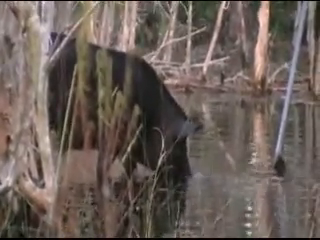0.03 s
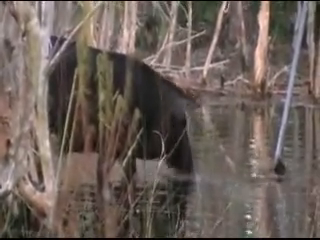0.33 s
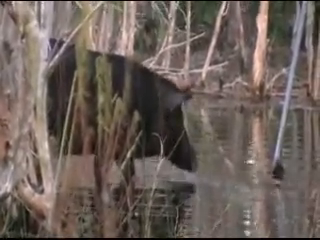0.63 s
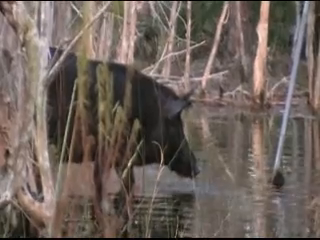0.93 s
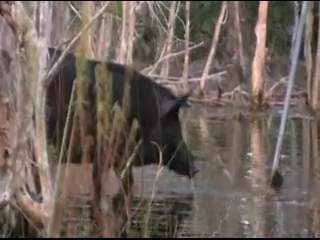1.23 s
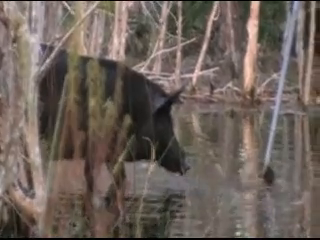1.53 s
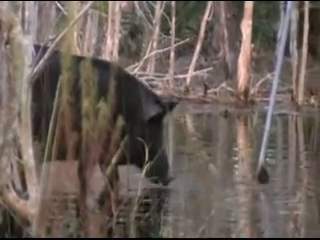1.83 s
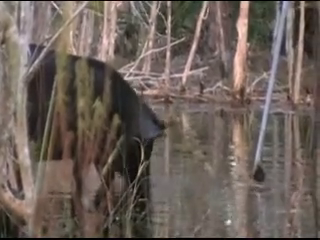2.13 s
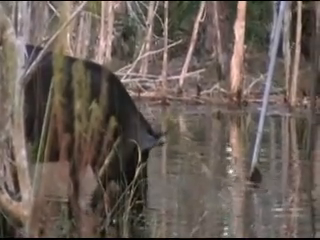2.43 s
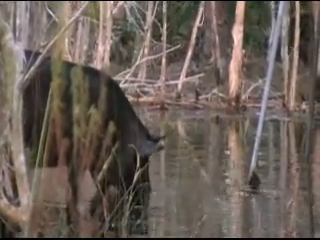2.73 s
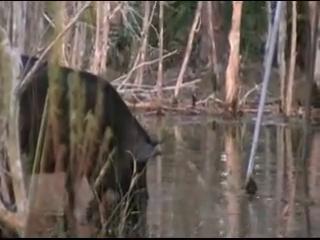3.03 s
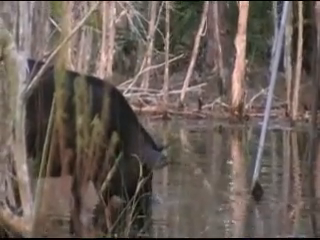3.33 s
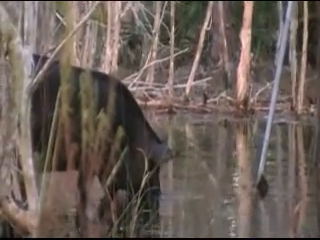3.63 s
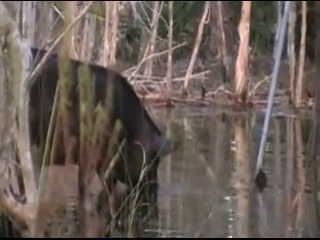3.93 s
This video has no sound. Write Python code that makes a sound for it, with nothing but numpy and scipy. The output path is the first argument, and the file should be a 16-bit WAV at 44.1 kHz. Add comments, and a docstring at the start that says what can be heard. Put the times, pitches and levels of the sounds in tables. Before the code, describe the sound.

A wild pig smacks wetly in shallow water, with dripping and a small bird chirping.

```python
"""A wild pig feeds in a shallow swamp, lifting its snout, smacking wetly and rooting among bubbles.
Each smack is a splat of noise and a ringing air pocket; under the strongest, the hollow mouth knocks.
Water streams off the snout as clouds of tiny ringing bubbles, and drops tick on the surface.
A small bird chips about twice a second, a trilled whistle that echoes among the trees.
A far low rumble and a faint hiss lie under it all."""
import sys
import numpy as np
from scipy import signal
from scipy.fft import rfft, irfft
from scipy.io import wavfile
from scipy.ndimage import uniform_filter1d

SR = 44100
rng = np.random.default_rng(int(sys.argv[2]) if len(sys.argv) > 2 else 0)


def to_wav(sig):
    """Store sig (one row per channel, or 1-D mono) as 16-bit WAV at the path in sys.argv[1].

    Samples outside -1..1 are clipped; the rate is SR.
    """
    pcm = np.clip(np.atleast_2d(sig), -1, 1) * 32767
    pcm = np.round(pcm).astype(np.int16)
    wavfile.write(sys.argv[1], SR, pcm.T)  # frames by channels


N = 176400
TIME = np.arange(N) / SR
EVENT_TIME = TIME[:SR // 6]  # time axis of one short sound
SMACK_ATTACK_S = 0.00076


def from_db(db):
    """Decibels to gain."""
    return 10 ** (np.asarray(db) / 20)


def rms_one(x):
    """Scale to unit power."""
    return x / np.sqrt(np.mean(x ** 2) + 1e-20)


def level(curve):
    """A fader ride through (t/s, level/dB) points."""
    return from_db(np.interp(TIME, *np.transpose(curve)))


def colour(spectrum, hz):
    """Gain at hz of an EQ curve through (f/Hz, level/dB) points."""
    points, db = np.transpose(spectrum)
    return from_db(np.interp(np.log(hz), np.log(points), db))


def coloured_noise(spectrum, size=N):
    """Steady noise of unit power that falls away steeply outside its EQ curve."""
    hz = np.maximum(np.fft.rfftfreq(size, 1 / SR), 1)
    skirts = np.minimum(1, np.minimum(hz / spectrum[0][0], spectrum[-1][0] / hz)) ** 24
    white = rfft(rng.standard_normal(size))
    return rms_one(irfft(white * colour(spectrum, hz) * skirts, size))


def burst(spectrum):
    """A short stretch of coloured noise."""
    return coloured_noise(spectrum, size=len(EVENT_TIME))


def wobble(samples):
    """A short random modulator: noise smoothed over some samples, at unit power."""
    return rms_one(uniform_filter1d(rng.standard_normal(len(EVENT_TIME)), size=samples))


def envelope(attack_s, t60_s, hold_s=0):
    """Rise, hold, then die away by 60 dB every t60_s."""
    rise = np.minimum(EVENT_TIME / attack_s, 1)
    return rise * from_db(-60 * np.maximum(EVENT_TIME - attack_s - hold_s, 0) / t60_s)


def add(out, s, sound):
    """Mix a sound in at time s."""
    start = max(int(s * SR), 0)
    out[start:start + len(sound)] += sound[:N - start]


def background():
    """The ambience bed: far rumble with a drone in it, faint hiss and a thin, insect-like sizzle."""
    # EQ curve of each noise layer: f/Hz, relative level/dB
    rumble_eq = [(16, -22.5), (48, -14), (80, -3), (97, 1.5), (135, -5), (200, -11.5), (330, -18),
                 (560, -31.5)]
    drone_eq = [(150, -8.5), (205, -1.5), (260, -6.5), (330, -25.5)]
    hiss_eq = [(450, 5), (690, 8.5), (850, 4.5), (1100, 2), (1700, -3), (2200, -4.5), (2900, -6.5),
               (4000, -8), (4700, -10.5), (6200, -13), (6850, -6), (7500, -15), (9300, -10), (9750, -28.5)]
    sizzle_eq = [(8700, -13), (9100, -3.5), (9550, -12)]
    # fader of each layer: t/s, level/dB
    rumble_fader = [(0, -48), (0.85, -49.5), (1.0, -46.5), (1.6, -49), (2.6, -48.5), (4, -49)]
    drone_fader = [(0.2, -56), (0.55, -58), (1.3, -53.5), (2.3, -49.5), (3.0, -54.5), (3.4, -50),
                   (4, -56.5)]
    hiss_fader = [(1.2, -67.5), (2.3, -67.5)]
    sizzle_fader = [(0, -77), (1.3, -79.5), (2.2, -85), (4, -81.5)]
    rumble = level(rumble_fader) * coloured_noise(rumble_eq)
    drone = level(drone_fader) * coloured_noise(drone_eq)
    hiss = level(hiss_fader) * coloured_noise(hiss_eq)
    sizzle = level(sizzle_fader) * coloured_noise(sizzle_eq)
    return rumble + drone + hiss + sizzle


def forest(x, build_s=0.018, t60_s=0.93):
    """Echoes scattered back by many trunks blur into a reverb tail."""
    t = TIME[:SR]
    echoes = rng.standard_normal(SR) * (1 - np.exp(-t / build_s)) * from_db(-60 * t / t60_s)
    return signal.fftconvolve(x, echoes / np.linalg.norm(echoes))[:N]


def bird():
    """Each chip is a short, fast-trilled, unsteady whistle over a lower rasp, followed by its echoes."""
    # chips: t/s, level/dB, f/Hz
    chips = [(0.019, -54.5, 4026), (0.58, -52.5, 4040), (1.170, -53, 3980), (1.736, -53, 3940),
             (2.129, -53, 3930), (2.746, -51, 4046), (3.255, -49, 4068), (3.725, -49, 4080)]
    # EQ curve of the rasp: f/Hz, relative level/dB
    rasp_eq = [(3150, -8.5), (3500, -4), (3850, -2.5), (4200, -2.5)]
    trill_hz, trill_depth_hz, jitter_hz = 322.4, 126, 40
    attack_s, rasp_db, echo_db = 0.0054, -10, -0.5
    trill = np.sin(2 * np.pi * trill_hz * EVENT_TIME)
    throb = 1 - 0.36 * trill  # the whistle swells at the bottom of each trill
    out = np.zeros(N)
    for s, db, hz in chips:
        pitch = hz + trill_depth_hz * trill + jitter_hz * wobble(samples=90)
        whistle = np.sin(2 * np.pi * np.cumsum(pitch) / SR)
        whistle *= throb * envelope(attack_s, t60_s=0.019, hold_s=0.0076)
        rasp = burst(rasp_eq) * envelope(attack_s, t60_s=0.11, hold_s=0.024)
        chip = whistle + from_db(rasp_db) * rasp
        add(out, s, from_db(db) * chip)
        add(out, s, from_db(db + echo_db) * forest(chip))
    return out


def bubble_cloud(flow, spectrum, peak_per_s, spread_db, cycles, pitches):
    """Tiny bubbles ring down 60 dB over some cycles; more flow makes more and louder ones."""
    strengths = from_db(spread_db * np.minimum(rng.exponential(1, N), 4)) * rng.choice([-1, 1], N)
    rate = peak_per_s * flow / flow.max()
    clicks = strengths * (rng.random(N) < rate / SR) / np.sqrt(rate)
    pitch_index = rng.integers(0, pitches, N)
    out = np.zeros(N)
    for k, hz in enumerate(np.geomspace(spectrum[0][0], spectrum[-1][0], pitches)):
        decay = np.exp(-np.log(1000) * hz / (cycles * SR))
        resonator = [1, -2 * decay * np.cos(2 * np.pi * hz / SR), decay * decay]
        ring = signal.lfilter([1, 0, -1], resonator, clicks * (pitch_index == k) + 1e-18)
        out += colour(spectrum, hz) * np.sqrt(1 - decay) * ring
    return flow * rms_one(out)


def trickle():
    """Water streams off the snout into the swamp: gurgling bubbles, fine spray and stray droplets."""
    # flow of each layer: t/s, level/dB
    gurgle_flow = [(0, -81), (0.33, -75), (0.45, -58.5), (0.51, -60.5), (0.58, -69.5), (0.74, -73.5),
                   (0.83, -63.5), (1.10, -66), (1.25, -75), (3.2, -77), (4, -79.5)]
    spray_flow = [(0, -83), (0.385, -82), (0.425, -69), (0.47, -63), (0.53, -60), (0.59, -80.5),
                  (0.87, -68.5), (0.92, -79), (1.03, -65), (1.10, -77), (2.0, -83), (2.25, -91.5)]
    dribble_flow = [(0.2, -83), (0.7, -74), (1.1, -71), (1.3, -77), (2.2, -82.5), (2.6, -87)]
    # EQ curve of each layer: f/Hz, relative level/dB
    gurgle_eq = [(500, -6), (900, 1.5), (1500, 1), (2100, 6.5), (2600, -2), (3100, -12.5)]
    spray_eq = [(3500, -7.5), (5100, -6.5), (5900, -1.5), (7700, 0), (8800, 4.5), (9600, -4)]
    dribble_eq = [(1100, -6), (2300, 1), (3600, -11.5), (6000, -4.5), (9000, -3.5)]
    gurgle = bubble_cloud(level(gurgle_flow), gurgle_eq,
                          peak_per_s=4500, spread_db=0, cycles=27.5, pitches=30)
    spray = bubble_cloud(level(spray_flow), spray_eq,
                         peak_per_s=10000, spread_db=1, cycles=43, pitches=20)
    dribble = bubble_cloud(level(dribble_flow), dribble_eq,
                           peak_per_s=200, spread_db=3, cycles=80, pitches=16)
    return gurgle + spray + dribble


def slosh(peak_s=0.834, spread_s=0.22, peak_db=-58.5, band_hz=(276, 357)):
    """One deep swell of water as the snout leaves the swamp."""
    swell = np.exp(-((TIME - peak_s) / spread_s) ** 2)
    return from_db(peak_db) * swell * coloured_noise([(hz, 0) for hz in band_hz])


def drop_hiss(hz, edge_ratio, edge_db=-10.5):
    """The hiss of a breaking drop, a noise band centred on hz."""
    return burst([(hz / edge_ratio, edge_db), (hz, 0), (hz * edge_ratio, edge_db)])


def drops():
    """Single drops hit the surface with bright ticks."""
    # drop hits: t/s, level/dB, f/Hz
    hits = [(0.351, -57.5, 6700), (0.5, -52, 3680), (0.573, -54.5, 6800), (0.727, -52.5, 8050),
            (0.749, -47, 5340), (0.778, -57, 7000), (0.795, -50.5, 7860), (0.805, -49, 5600),
            (0.81, -47.5, 9060), (0.876, -55, 7050), (0.954, -57.5, 5800), (1.121, -54.5, 6550),
            (1.146, -56.5, 6600), (1.359, -64, 6950), (1.43, -58, 6900), (1.547, -61, 6000),
            (1.915, -58, 6540), (1.976, -45, 7960), (2.102, -56.5, 4400), (2.16, -54, 9200),
            (3.414, -60.5, 7200)]
    out = np.zeros(N)
    for s, db, hz in hits:
        tick = drop_hiss(hz, edge_ratio=1.65) * envelope(attack_s=0.00044, t60_s=0.013)
        add(out, s, from_db(db) * tick)
    return out


def spatters(flutter_db=0.5):
    """Many tiny drops land together in soft puffs of hiss that swell and fade."""
    # spatters: peak t/s, spread/s, level/dB, f/Hz
    puffs = [(0.867, .011, -60.5, 6100), (1.69, 0.0099, -68.5, 5800), (1.833, 0.01, -64, 7400),
             (1.995, 0.014, -71, 7660), (2.097, 0.014, -67.5, 6040)]
    middle_s = EVENT_TIME.mean()
    out = np.zeros(N)
    for s, spread_s, db, hz in puffs:
        gain = from_db(db - flutter_db * wobble(samples=70))
        swell = np.exp(-((EVENT_TIME - middle_s) / spread_s) ** 2)
        add(out, s - middle_s, gain * swell * drop_hiss(hz, edge_ratio=2))
    return out


def mouth_knocks():
    """The hollow of the mouth rings briefly as it snaps open, giving body to the strongest smacks."""
    # mouth resonances: f/Hz, relative level/dB, t60/s
    modes = [(450, -2.5, 0.045), (662, 0, 0.078), (1160, -5, .022)]
    # knocks: t/s, level/dB
    knocks = [(0.7883, -58.5), (0.9227, -51.5), (1.2836, -53)]
    ring = sum(from_db(db) * np.sin(2 * np.pi * hz * EVENT_TIME) * envelope(SMACK_ATTACK_S, t60_s)
               for hz, db, t60_s in modes)
    out = np.zeros(N)
    for s, db in knocks:
        add(out, s, from_db(db) * ring)
    return out


def smacks(pitch_rise_per_s=1.7):
    """A wet splat sets off an air pocket, whose ring swells and rises slightly in pitch."""
    # plops and smacks of the mouth: t/s, level/dB, f/Hz, splat level relative to the ring/dB
    plops = [(0.372, -55, 1550, -13), (0.425, -57, 1570, -3), (0.434, -53.5, 2300, -4),
             (0.456, -50, 2070, -17), (0.472, -52.5, 2060, -7), (0.496, -52.5, 2490, -13),
             (0.612, -58, 1520, -4), (0.749, -56, 1900, -5), (0.770, -63, 890, 13.5),
             (0.788, -43, 1040, -7), (0.793, -41, 1306, -4), (0.805, -44, 2115, -9.5),
             (0.874, -52, 1550, -2.5), (0.9225, -41, 2293, -11.5), (1.283, -44, 2300, -4),
             (1.415, -56.5, 1390, -9), (1.429, -61.5, 2440, 3.5), (1.975, -60, 1700, 3),
             (2.101, -58, 2920, 0), (3.209, -57.5, 1450, 0), (3.218, -58.5, 750, -0.5),
             (3.462, -44.5, 1024, -11.5), (3.478, -53.5, 1240, -2.5), (3.61, -63, 2630, -16),
             (3.745, -54, 1590, -1.5)]
    # EQ curve of the splat: f/Hz, relative level/dB
    splat_eq = [(400, 4), (650, 0.5), (900, 5.5), (1200, 2.5), (1700, -1.5), (2400, -2), (3100, -13.5),
                (4000, -10)]
    out = np.zeros(N)
    for s, db, hz, splat_db in plops:
        phase = 2 * np.pi * hz * EVENT_TIME * (1 + pitch_rise_per_s * EVENT_TIME / 2)
        ring = np.sin(phase) * envelope(attack_s=0.0025, t60_s=0.021)
        splat = from_db(splat_db) * burst(splat_eq) * envelope(SMACK_ATTACK_S, t60_s=0.03)
        add(out, s, from_db(db) * (ring + splat))
    return out


def scene():
    """The mono mix: pig and water up front with a light forest echo, bird and ambience behind."""
    echo_db = -20.5
    pig = smacks() + mouth_knocks() + drops() + spatters() + trickle() + slosh()
    return (pig + from_db(echo_db) * forest(pig) + bird() + background())[None]


def record(dry):
    """A steep low-pass takes off the top."""
    cutoff_hz = 10100
    return signal.sosfilt(signal.ellip(10, .1, 70, cutoff_hz, fs=SR, output="sos"), dry)


dry = scene()
out = record(dry)
to_wav(out)
```